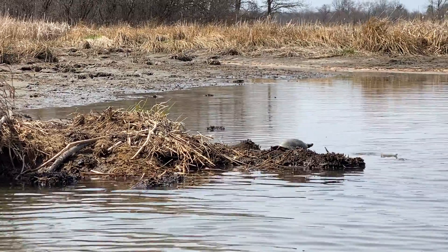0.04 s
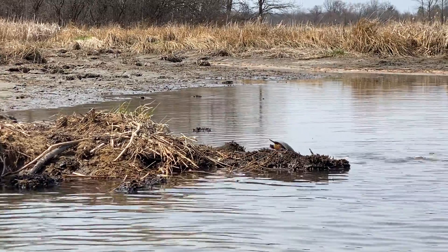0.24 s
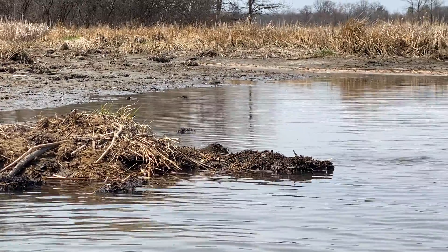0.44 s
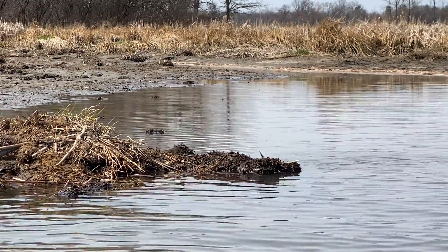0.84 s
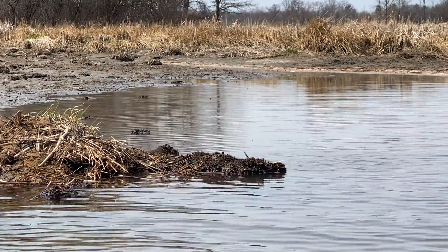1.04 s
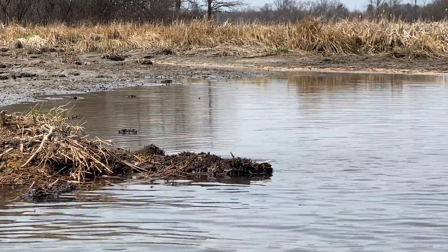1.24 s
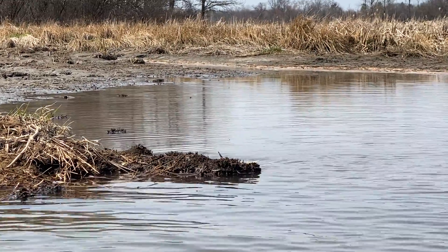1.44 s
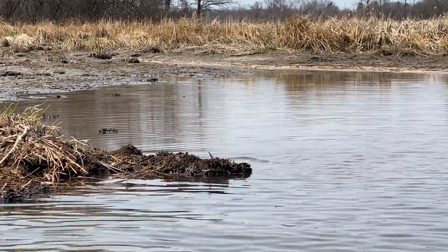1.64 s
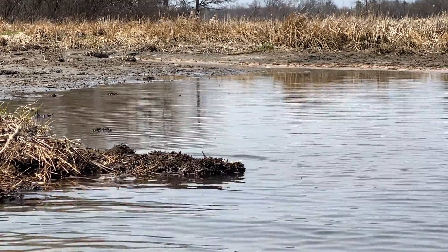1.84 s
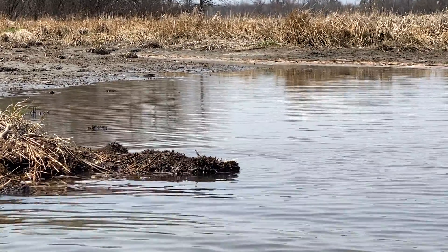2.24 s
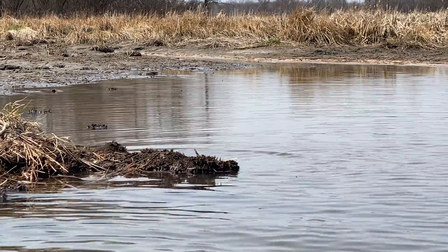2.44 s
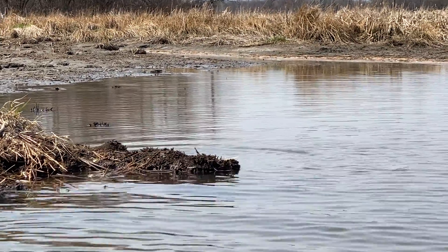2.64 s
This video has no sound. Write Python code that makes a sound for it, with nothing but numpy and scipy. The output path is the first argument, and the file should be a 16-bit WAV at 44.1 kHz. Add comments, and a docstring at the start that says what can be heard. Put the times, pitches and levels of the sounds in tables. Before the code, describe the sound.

A turtle slips into water with a small splash, under wind rumbling on the microphone.

```python
"""Gusts of wind rumble and thump on the microphone. A turtle scrabbles off a mound of dead reeds,
its claws snapping dry stalks, and slips into marsh water with a small splash: its shell and feet
slap the surface, air pockets ring and droplets fall. Far birds chirp, trill and whistle across
the open water. Near the end the breeze freshens and a few faint, high ticks sound."""
import sys
import numpy as np
from scipy import signal
from scipy.fft import rfft, irfft, next_fast_len
from scipy.io import wavfile
from scipy.ndimage import uniform_filter1d, map_coordinates

SR = 44100
rng = np.random.default_rng(int(sys.argv[2]) if len(sys.argv) > 2 else 0)


def int16_out(signal):
    """Quantize to a 16-bit WAV file."""
    q = np.round(np.clip(np.atleast_2d(signal).T, -1, 1) * 32767)
    wavfile.write(sys.argv[1], SR, q.astype(np.int16))


N = 123479

# how wet litter and water soften the treble of every contact: pitch_hz, gain_db
WET_DAMPING = [(100, 0), (7400, 0), (8600, -10), (12000, -13), (13200, -27), (15500, -24)]
BANK_ECHO_S = 0.028
TURTLE_SCATTER_DB, WIND_SIDE_DB = -17.5, -10.5


def scrabble():
    """Claws snap dry stalks while the shell drags over the reed litter."""
    # each stalk rings and cracks: start_s, ring_db, ring_hz, crack_db, crack_hz
    snaps = [(.173, -73.5, 3540, -85, 5000), (0.2791, -76, 1820, -63, 6800), (0.33, -64, 1750, -91, 4040),
             (0.3478, -55.5, 1940, -54, 3630), (0.3482, -63, 6860, -80, 6000),
             (0.3545, -57.5, 1960, -80.5, 4460), (0.3595, -63, 1920, -79, 4970),
             (0.3635, -63, 1720, -74, 3540), (.364, -62.5, 906, -82, 3000),
             (0.3735, -56.5, 5320, -55.5, 8200), (0.3995, -71, 3960, -79, 5000),
             (.4022, -75, 1760, -66, 5800), (0.505, -66.5, 5200, -83, 5400)]
    # loudness of the rubbed litter: time_s, level_db
    rub_levels = [(0, -110), (.17, -85.5), (.25, -79.5), (.32, -81.5), (.36, -68), (.39, -74), (.44, -75),
                  (.49, -84), (.53, -110)]
    # tone of the rubbed litter: pitch_hz, gain_db
    rub_tone = [(250, -30.5), (450, 7), (1000, 2.5), (1900, 0.5), (3000, -14.5), (5300, -11.5), (7200, -12)]
    stalks = np.zeros(N)
    for start_s, ring_db, ring_hz, crack_db, crack_hz in snaps:
        ring = amp(ring_db) * burst(ring_hz, width=0.06, fade_s=0.018)
        crack = amp(crack_db) * burst(crack_hz, width=0.33, fade_s=0.015)
        add(stalks, start_s, ring + crack)
    snapping = outdoors(shaped(stalks, WET_DAMPING), TURTLE_SCATTER_DB)
    return snapping + level(rub_levels) * grains(rub_tone)


def splash():
    """Shell and feet slap the water, throwing spray, trapping air and scattering droplets."""
    # hits on the water: start_s, slap_db, slap_hz, spray_db, spray_hz
    slaps = [(0.5108, -69, 2000, -72, 5000), (0.5165, -43.5, 1020, -66, 5200),
             (0.518, -48.5, 1360, -56.5, 4930), (.524, -49, 1435, -79.5, 4500),
             (0.5324, -53.5, 1200, -68.5, 6530), (.536, -52, 1610, -76, 5360),
             (0.5441, -60.5, 1850, -70.5, 5000), (0.5502, -57.5, 2800, -67.5, 5200),
             (0.5523, -68, 1900, -74, 3500), (0.5597, -52, 1580, -62.5, 4400),
             (0.568, -66, 2300, -63, 4600), (0.581, -54, 1790, -84, 4050), (0.6034, -49, 1160, -80, 3960),
             (0.6052, -58, 2000, -53, 3900)]
    # air pockets in mud and water: start_s, level_db, pitch_hz, fade_s
    pockets = [(.328, -51, 415, 0.043), (.4255, -64, 2320, .05), (0.5165, -46.5, 850, 0.03),
               (0.5164, -54, 1276, 0.035), (.519, -54.5, 647, 0.048), (.5335, -48, 570, .025),
               (0.549, -53, 3120, 0.014), (.606, -60, 1520, 0.031), (.675, -74, 3900, .015),
               (.713, -77, 4100, .012)]
    # loudness of the falling droplets: time_s, level_db
    droplet_levels = [(.495, -100), (.514, -72.5), (.523, -73), (.55, -69), (.575, -70), (.592, -82.5),
                      (.61, -69), (.635, -77.5), (.68, -88.5), (.78, -104), (.85, -120)]
    # tone of the falling droplets: pitch_hz, gain_db
    droplet_tone = [(300, -24), (600, -1), (1200, 5.5), (1900, 6), (2800, -6.5), (5500, -13), (7500, -18),
                    (9000, -25), (15000, -34)]
    water = np.zeros(N)
    for start_s, slap_db, slap_hz, spray_db, spray_hz in slaps:
        slap = amp(slap_db) * burst(slap_hz, width=0.28, fade_s=0.015)
        spray = amp(spray_db) * burst(spray_hz, width=0.27, fade_s=0.008)
        add(water, start_s, slap + spray)
    for start_s, level_db, pitch_hz, fade_s in pockets:
        add(water, start_s, amp(level_db) * bubble(pitch_hz, fade_s))
    gurgle_start_s, gurgle_length_s = 0.52, 0.058
    for when, pitch, size in rng.random(size=(14, 3)):  # small random bubbles under the splash
        pitch_hz = 1700 * np.exp(0.45 * (2 * pitch - 1))
        gurgle = amp(-62) * (0.5 + size) * bubble(pitch_hz, fade_s=0.015)
        add(water, gurgle_start_s + when * gurgle_length_s, gurgle)
    splashing = outdoors(shaped(water, WET_DAMPING), TURTLE_SCATTER_DB)
    return splashing + level(droplet_levels) * grains(droplet_tone)


def bubble(pitch_hz, fade_s):
    """An air pocket rings, rising in pitch as it dies away."""
    t = np.arange(SR // 8) / SR
    cycles = pitch_hz * t * (1 + 0.09 * t / fade_s)
    return rise_and_fade(t, 0.00098, fade_s) * np.sin(2 * np.pi * cycles)


def grains(tone, per_s=900):
    """Many tiny clicks of slightly uneven size blend into a rustle or a patter."""
    hits = rng.random((2, N)) < per_s / SR
    sizes = amp(np.minimum(rng.exponential(size=(2, N)), 3))
    clicks = hits * sizes * rng.choice([-1, 1], (2, N))
    return stereo(coloured(shaped(clicks, WET_DAMPING), tone), side_db=-12)


def gusts():
    """Wind rumbles on the microphone; the stronger the gust, the more of it is flutter."""
    # strength of the wind: time_s, level_db
    gust_levels = [(0.0, -49), (0.19, -56.5), (0.23, -43.5), (0.3, -58.5), (0.37, -58), (0.4, -46),
                   (0.51, -35), (0.54, -34.5), (0.6, -35), (0.67, -52), (0.72, -42.5), (0.75, -53),
                   (0.79, -44), (0.83, -55.5), (0.86, -38.5), (0.89, -38), (0.95, -52.5), (0.97, -39),
                   (1.03, -38.5), (1.06, -54), (1.08, -44), (1.15, -59.5), (1.23, -34.5), (1.3, -48.5),
                   (1.37, -40), (1.46, -51), (1.57, -30.5), (1.6, -34.5), (1.64, -30), (1.68, -45.5),
                   (1.73, -34.5), (1.83, -39.5), (1.86, -57), (1.96, -50.5), (1.99, -58.5), (2.13, -49),
                   (2.18, -57), (2.24, -43), (2.27, -61), (2.31, -44.5), (2.38, -54), (2.47, -38.5),
                   (2.52, -34), (2.56, -52.5), (2.76, -52.5), (2.8, -48)]
    # tone of the deep rumble: pitch_hz, gain_db
    rumble_tone = [(18, -34), (30, -18), (48, 0.5), (72, -0.5), (102, -4.5), (130, -18), (180, -40),
                   (260, -59), (500, -100), (1500, -140)]
    # tone of the higher flutter: pitch_hz, gain_db
    flutter_tone = [(80, -18), (125, 4.5), (175, -6), (230, -20.5), (320, -31.5), (420, -38.5), (700, -60),
                    (2500, -120)]
    strength, strong_gust = level(gust_levels), amp(-40)
    rumble = amp(0.5) * turbulence(rumble_tone, steady_s=0.038)
    flutter = amp(-12) * turbulence(flutter_tone, steady_s=0.037)
    return strength * (rumble + np.sqrt(strength / strong_gust) * flutter)


def turbulence(tone, steady_s):
    """Swirling air: noise whose loudness is evened out over spans longer than steady_s."""
    pair = noise(tone)
    power = uniform_filter1d(abs(signal.hilbert(pair)) ** 2 / 2, int(steady_s * SR), axis=1)
    gain = uniform_filter1d(1 / np.sqrt(abs(power) + 0.013), size=400, axis=1)
    return stereo(pair * gain, WIND_SIDE_DB)


def thumps():
    """Single swirls of air bump against the microphone."""
    # one swirl a row: middle_s, length_s, relative_db, pitch_hz
    swirls = [(0.461, 0.033, -43.5, 178), (.53, 0.0638, -42.5, 156), (0.579, .04, -38, 143.5),
              (.972, 0.036, -46, 122.6), (1.015, .04, -48.5, 142), (1.231, .05, -45.5, 150),
              (1.349, 0.033, -38, 164), (1.565, 0.033, -39.5, 189.7), (1.632, .05, -41, 150.3),
              (1.732, 0.034, -43, 210), (1.765, 0.033, -41.5, 186), (1.815, 0.034, -40.5, 166),
              (2.237, .03, -63, 470), (2.291, .04, -56, 362), (2.305, 0.029, -42, 216),
              (2.355, 0.0513, -49, 160), (2.457, 0.034, -39.5, 292), (2.458, 0.041, -34, 158.4),
              (2.466, .025, -56.5, 464), (2.506, .02, -56.5, 428), (2.51, .03, -40.5, 209),
              (2.635, 0.052, -52.5, 160), (2.67, .03, -51.5, 226), (2.736, .03, -55, 229)]
    pair = np.zeros((2, N))
    for middle_s, length_s, relative_db, pitch_hz in swirls:
        swell = np.hanning(int(length_s * SR))
        for channel in pair:
            thump = band_noise(pitch_hz, width=0.17)[:len(swell)] * swell
            add(channel, middle_s - length_s / 2, amp(relative_db) * thump / abs(thump).max())
    return amp(1) * stereo(pair, WIND_SIDE_DB)


def birds():
    """Far birds give falling chirps and one trill; the bank echoes the high notes most."""
    # gliding chirps: start_s, length_s, start_hz, end_hz, bend, level_db, roughness (0 to 1)
    chirps = [(0.22, 0.038, 7400, 5020, -0.33, -75.5, .6), (0.411, 0.029, 7250, 4900, -0.36, -71.5, 0.7),
              (0.59, .028, 7100, 5010, -0.76, -75, .6), (0.761, 0.05, 7250, 4890, 0.088, -77.5, 0.9),
              (1.143, 0.01, 4800, 3020, -0.69, -75.5, .5), (1.138, .014, 2920, 2680, 0.24, -81, 0.65),
              (1.269, 0.026, 3950, 3620, -2, -76.5, 0.3), (1.291, 0.032, 4000, 3580, -2, -77, .6),
              (2.314, 0.033, 3900, 3690, 1.7, -88, .8), (2.598, 0.043, 3900, 3660, 2, -86, 0.75)]
    calls = np.zeros(N)
    for start_s, *shape in chirps:
        add(calls, start_s, bird_note(*shape))
    calls += trill()
    echo = filtered(bank_echo(calls), lambda hz: np.minimum(hz / 6000, 1))
    return outdoors(calls + amp(-11) * echo, scatter_db=-10)


def trill(start_s=0.862, syllables_per_s=58, edge_drop_db=5.5):
    """A bird buzzes through eight quick two-voiced syllables, loudest in the middle."""
    # the two voices of a syllable: delay_s, length_s, start_hz, end_hz, bend, level_db
    voices = [(0, 0.024, 3046, 2526, .5, -73), (.006, 0.025, 2760, 3690, 0.95, -72.5)]
    song = np.zeros(N)
    for count, place in enumerate(np.linspace(-1, 1, 8)):
        for delay_s, length_s, start_hz, end_hz, bend, level_db in voices:
            drift = 1 + 0.012 * rng.standard_normal()
            note_db = level_db - edge_drop_db * place ** 2
            note = bird_note(length_s, start_hz * drift, end_hz * drift, bend, note_db)
            add(song, start_s + count / syllables_per_s + delay_s, note)
    return song


def bird_note(length_s, start_hz, end_hz, bend, level_db, roughness=0):
    """A gliding note swells and fades; roughness shakes its pitch and loudness."""
    progress = np.linspace(0, 1, int(length_s * SR))
    wobbles_per_s = 500
    shake, tremble = (roughness * map_coordinates(wobbles, [progress * length_s * wobbles_per_s])
                      for wobbles in rng.standard_normal(size=(2, 64)))
    glide = np.expm1(-bend * progress) / np.expm1(-bend)  # a positive bend makes it level off
    pitch_hz = (start_hz + (end_hz - start_hz) * glide) * (1 + 0.04 * shake)
    loudness = amp(level_db) * unit(amp(5 * tremble)) * np.hanning(len(progress)) ** 0.8
    return loudness * np.sin(2 * np.pi * (np.cumsum(pitch_hz) / SR + rng.random()))


def whistle():
    """A bird's clean whistle slides up and levels off; the bank returns it faintly."""
    # path of the whistle: time_s, pitch_hz, level_db
    path = [(1.616, 2350, -97), (1.624, 2560, -79), (1.634, 2850, -73), (1.643, 3170, -67.5),
            (1.653, 3260, -62), (1.668, 3310, -61.5), (1.676, 3330, -66), (1.688, 3365, -66),
            (1.697, 3380, -86), (1.7, 3380, -110)]
    time_s, pitch_hz, level_db = np.transpose(path)
    t = np.arange(N) / SR
    cycles = np.cumsum(np.interp(t, time_s, pitch_hz)) / SR
    singing = (t > time_s[0]) & (t < time_s[-1])
    call = amp(np.interp(t, time_s, level_db)) * np.sin(2 * np.pi * cycles) * singing
    return outdoors(call + amp(-17) * bank_echo(call), scatter_db=-19)


def ticks():
    """Faint, high ticks at the microphone, different in each ear."""
    # one tick a row: start_s, relative_db, pitch_hz
    tick_list = [(2.231, -76, 11330), (2.63, -74, 12700), (2.64, -67.5, 12000), (2.683, -78, 13130),
                 (2.73, -77.5, 13540)]
    pair = np.zeros((2, N))
    for start_s, relative_db, pitch_hz in tick_list:
        for channel in pair:
            add(channel, start_s, amp(relative_db) * burst(pitch_hz, width=0.2, fade_s=0.025))
    return stereo(pair, side_db=4)


def breeze():
    """A soft breeze freshens over the steady hush of marsh air."""
    # loudness of the breeze: time_s, level_db
    rush_levels = [(0, -84), (1.85, -79.5), (2.12, -75), (2.26, -64.5), (2.38, -64), (2.48, -66),
                   (2.58, -69.5), (2.8, -69)]
    # tone of the breeze: pitch_hz, gain_db
    rush_tone = [(90, -13), (150, 3), (210, 2.5), (300, -7), (520, -11), (750, -19.5), (1100, -30),
                 (3000, -64)]
    # tone of the still air: pitch_hz, gain_db
    hush_tone = [(30, 0), (350, 0), (700, -7.5), (1400, -15.5), (2800, -21.5), (7200, -24), (8500, -28),
                 (11500, -28), (13000, -37), (15500, -35)]
    rush = level(rush_levels) * noise(rush_tone)
    hush = amp(-79) * noise(hush_tone)
    return stereo(rush + hush, side_db=-9)


def bank_echo(sound):
    """The bank sends a sound back a moment later."""
    return np.pad(sound, (int(BANK_ECHO_S * SR), 0))[:N]


def outdoors(sound, scatter_db):
    """A sound plus its brief scatter from reeds and banks, in stereo."""
    t = np.arange(SR // 3) / SR
    tail = rng.standard_normal((2, len(t))) * rise_and_fade(t, rise_s=0.008, fade_s=0.12)
    scatter = signal.fftconvolve(sound[None], tail / np.linalg.norm(tail[0]), axes=1)[:, :N]
    return sound + amp(scatter_db) * stereo(scatter, side_db=0)


def burst(pitch_hz, width, fade_s):
    """A sharp, dying puff of noise with a peak of 1."""
    t = np.arange(SR // 10) / SR
    puff = band_noise(pitch_hz, width) * rise_and_fade(t, 0.00038, fade_s)
    return puff / abs(puff).max()


def band_noise(pitch_hz, width):
    """A tenth of a second of noise around one pitch; width is a fraction of that pitch."""
    hz = np.fft.fftfreq(SR // 10, 1 / SR)
    band = (hz > 0) * np.exp(-0.5 * (np.log((abs(hz) + 1) / pitch_hz) / width) ** 2)
    wave = np.fft.ifft(np.fft.fft(rng.standard_normal(len(hz))) * band)
    return wave.real / np.sqrt(abs(wave) + abs(wave).mean() / 2)  # partly evens out the loudness


def rise_and_fade(t, rise_s, fade_s):
    """A loudness curve that rises quickly and falls by 60 dB every fade_s."""
    return amp(-60 * t / fade_s) * (1 - np.exp(-t / rise_s))


def noise(tone):
    """Two separate noises with the same tone."""
    return coloured(rng.standard_normal((2, N)), tone)


def coloured(sound, tone):
    """A sound given a tone, then an average strength of 1."""
    return unit(shaped(sound, tone))


def shaped(sound, tone):
    """Turn pitches up or down along rows of pitch_hz, gain_db."""
    pitch_hz, gain_db = np.transpose(tone)
    return filtered(sound, lambda hz: amp(np.interp(np.log(hz + 1), np.log(pitch_hz), gain_db)))


def filtered(sound, gain_at):
    """Multiply each frequency in a sound by gain_at(hz)."""
    size = next_fast_len(N + SR // 2)
    return irfft(rfft(sound, size) * gain_at(np.fft.rfftfreq(size, 1 / SR)), size)[..., :N]


def level(rows):
    """A gain for every sample from rows of time_s, level_db."""
    return amp(np.interp(np.arange(N) / SR, *np.transpose(rows)))


def stereo(pair, side_db):
    """Left and right from a middle and a side signal; more side sounds wider."""
    return pair[0] + np.array([[1], [-1]]) * amp(side_db) * pair[1]


def add(track, start_s, sound):
    """Mix a short sound into a track."""
    first = max(round(start_s * SR), 0)
    track[first:first + len(sound)] += sound[:N - first]


def amp(db):
    """Turn decibels into a multiplier."""
    return 10 ** (np.asarray(db) / 20)


def unit(sound):
    """Scale to an average strength (rms) of 1."""
    return sound / np.sqrt(np.mean(sound ** 2) + 1e-20)


def scene():
    """Wind, turtle, birds and ticks together."""
    wind = gusts() + thumps() + breeze()
    turtle = scrabble() + splash()
    return wind + turtle + birds() + whistle() + ticks()


def record(dry):
    """The microphone keeps nothing above its highest pitch."""
    top_hz = 15750
    return filtered(dry, lambda hz: hz < top_hz)


dry = scene()
out = record(dry)
int16_out(out)
```